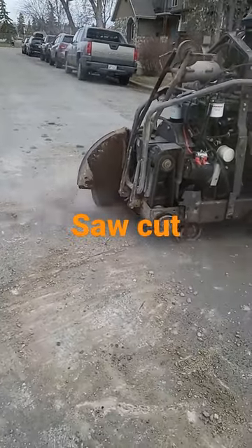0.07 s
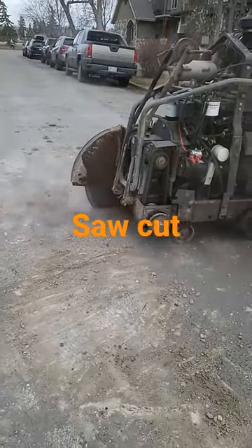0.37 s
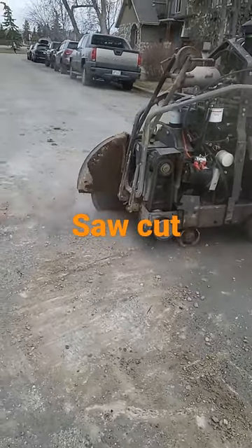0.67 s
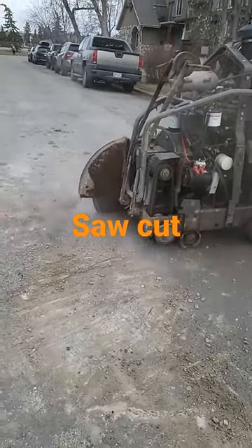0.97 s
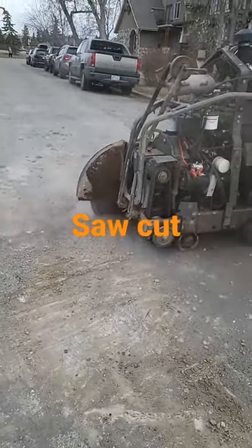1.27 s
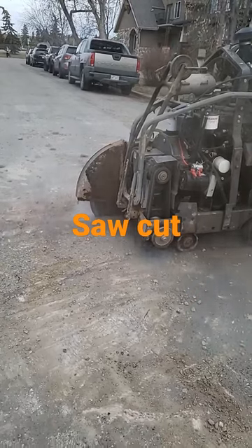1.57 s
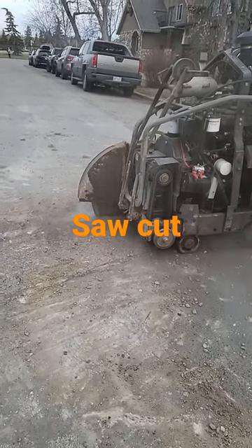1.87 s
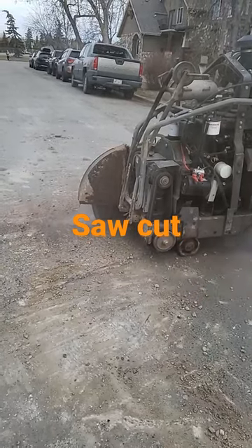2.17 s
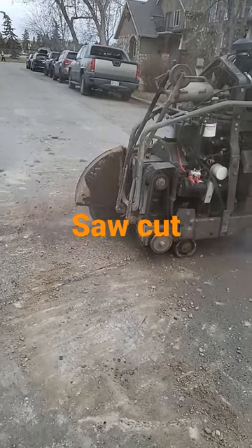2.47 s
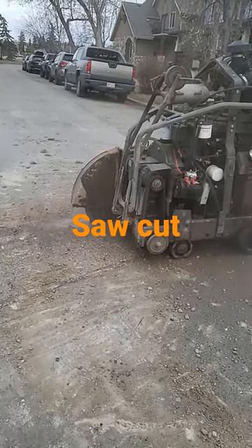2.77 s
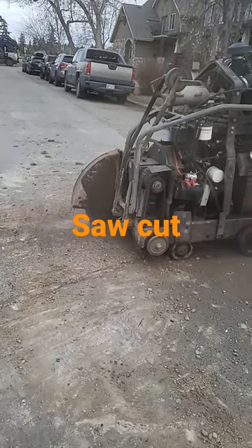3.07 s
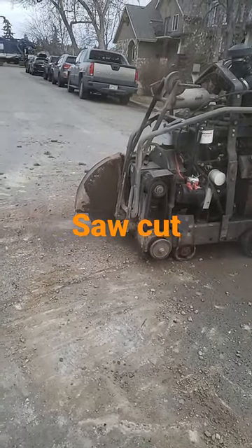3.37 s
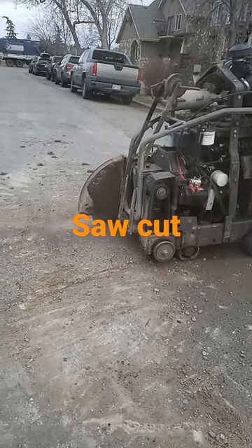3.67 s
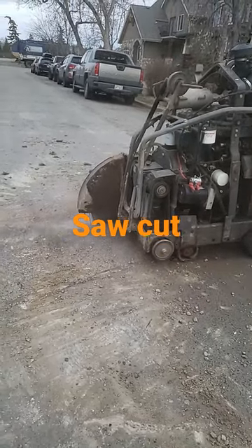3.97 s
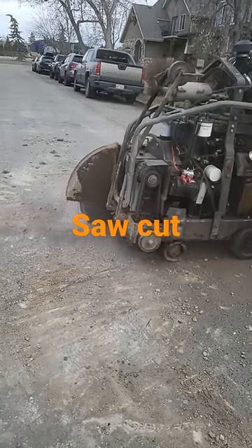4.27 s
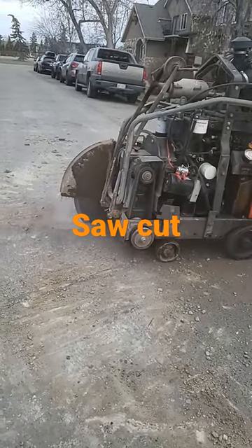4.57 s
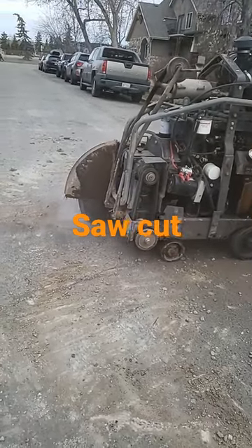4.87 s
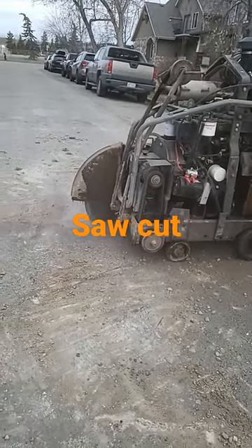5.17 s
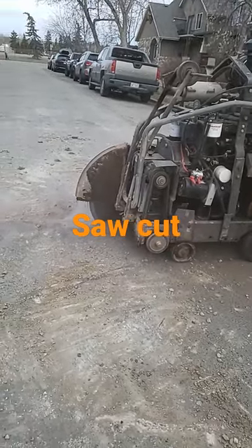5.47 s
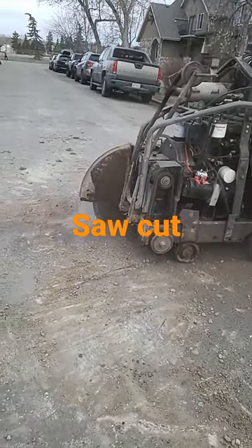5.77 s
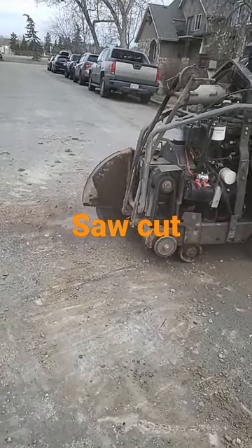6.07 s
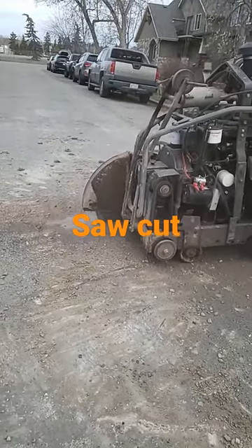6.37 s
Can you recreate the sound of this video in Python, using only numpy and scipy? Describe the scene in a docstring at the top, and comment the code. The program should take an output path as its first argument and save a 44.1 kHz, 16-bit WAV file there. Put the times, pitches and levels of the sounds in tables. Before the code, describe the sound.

Outdoors on a street, a few metres away, a diesel pavement saw drones and rattles without a break. Gritty, sizzling grinding comes in two main stretches, each dragging the engine down into a rough bark, with ringing tones from the blade rubbing in the cut. After each, the hiss eases, the engine rises and the spinning blade whistles. The grinding returns right at the end.

```python
"""A walk-behind road saw is cutting a street a few metres away: its diesel engine drones, barks and
rattles while the teeth grind stone with a gritty hiss that rings the steel disc. After a second the
blade runs free, the engine speeds up and smooths out, and the blade's slots whistle clearly in the air.
At three seconds it bites again: the engine sags and barks, and the blade's side sings against the cut.
Past five seconds it runs free once more, then starts a last bite just after six."""
import sys
import numpy as np
from scipy.fft import rfft, irfft
from scipy.io import wavfile

SR = 44100
rng = np.random.default_rng(int(sys.argv[2]) if len(sys.argv) > 2 else 0)


def generate_wav(sig):
    """Save sig (samples, or channels by samples) to the path in sys.argv[1] as 16-bit PCM at SR."""
    pcm = np.round(np.clip(np.atleast_2d(sig).T, -1, 1) * 32767).astype(np.int16)
    wavfile.write(sys.argv[1], SR, pcm)


N = 282681
TIME, FREQ = np.arange(N) / SR, np.arange(N // 2 + 1) * SR / N

# Levels in the tables are relative: the functions add further gains.
# engine speed, as cylinder firings per second: time_s, firing_hz
ENGINE_SPEED = [(0.0, 97.1), (0.48, 89.8), (0.69, 96.6), (0.96, 99.2), (1.09, 103.9), (1.16, 105.2),
                (3.11, 105.2), (3.62, 92.3), (3.87, 88.0), (4.09, 93.1), (4.34, 89.5), (4.6, 81.5),
                (5.0, 84.2), (5.19, 84.7), (5.37, 98.4), (5.44, 103.9), (5.5, 104.7), (6.09, 104.9),
                (6.36, 100.4), (6.41, 100.2)]
# how loud the engine is where the listener stands: time_s, gain_db
ENGINE_LOUDNESS = [(0, -0.5), (1.2, 0.2), (2.0, -0.5), (2.65, 3), (3.35, 4), (3.55, 1.2), (4.1, 1.4),
                   (4.7, -0.5), (5.6, 1), (6.41, 0.4)]
# exhaust tones: firing_multiple, free_db, full_fuel_db, full_drag_added_db, shift_rad, flicker_db
DRONE_TONES = [(1, -26, -17.5, 1.15, 1.87, 1.03), (2, -27, -28.5, 3, 1.17, 2.17),
               (3, -34.5, -24.5, -12, 0.31, 2.0)]
# strength of the four cylinders in firing order: level_db
CYLINDER_LEVELS = [2.5, -4, 1.5, -.5]
# pitches at which the muffler rings: pitch_hz, width_hz, level_db
MUFFLER_RINGS = [(355, 90, 0), (412, 90, -.5), (475, 90, -4), (555, 80, -10.5), (840, 90, -21),
                 (1010, 80, -22.5)]
# lows and highs of the engine's rattle: frequency_hz, level_db
RATTLE_COLOUR = [(25, -10), (60, -1.5), (130, -1), (370, 10.5), (650, -2), (820, -1.5), (1150, -7),
                 (1420, -5), (1580, -5.5), (2050, -5.5), (2350, -7), (4300, -9.5), (7000, -26),
                 (15000, -34)]
# tones of the crankshaft and belt: firing_multiple
SHAFT_MULTIPLES = [.59, 1.5, 2.5, 3.5, 4, 4.5, 5, 7, 9.75]
# strength of each of those tones: level_db
SHAFT_LEVELS = [-49.5, -41, -47, -40.5, -42, -45.5, -59, -49, -56]
# how hard the blade bites the pavement: time_s, level_db
BLADE_BITE = [(0.0, -24.5), (0.34, -22.5), (0.59, -25), (0.77, -22.5), (1.14, -29.5), (1.25, -37),
              (1.96, -39.5), (2.68, -37), (3.14, -37), (3.19, -21), (3.32, -20.5), (3.45, -24), (3.71, -25),
              (4.0, -28), (4.12, -23), (5.19, -24.5), (5.3, -30.5), (5.64, -35), (5.98, -36.5), (6.07, -31),
              (6.39, -25), (6.41, -23)]
# lows and highs of the grinding stone: frequency_hz, level_db
STONE_COLOUR = [(500, -14), (1500, -11), (2100, -8), (2600, -4), (2900, -2), (4400, 0), (5600, -2.3),
                (7400, -4.5), (8100, -3.5), (9100, -7), (10500, -5.7), (12000, -14), (15500, -18)]
# the very high sizzle above the grinding: frequency_hz, level_db
HIGH_SIZZLE_COLOUR = [(5000, -50), (9500, -20), (11300, -7), (11900, .5), (12700, 1), (13600, -1.5),
                      (14300, 0), (15500, -2)]
# pitches that the blade guard boosts: pitch_hz, width_hz, boost_db
GUARD_RINGS = [(3750, 160, 1.5), (7750, 220, 3), (11930, 130, 2), (12650, 120, 1.5), (14370, 120, 2)]
# pitches at which the steel disc rings: pitch_hz, level_db
DISC_RINGS = [(1420, -3), (2885, 1), (3600, -8), (4070, -4), (4410, 1), (4850, -6), (5146, -4), (6900, -7),
              (7670, -3), (9269, -4), (10780, -4), (11957, -1), (12370, -3), (14748, -6)]
# the whistle falls with engine speed, then levels off: firing_hz, pitch_hz
WHISTLE_PITCH = [(82, 1655), (90, 1675), (96.5, 1715), (100.3, 1792), (105.2, 1843)]
# tones in the whistle: pitch_multiple, free_db, full_drag_db
WHISTLE_TONES = [(.983, -6, -15), (1, 3, -8.5), (1.073, -10, -20)]
# moments when the whistle swells: start_s, end_s, level_db
WHISTLE_SWELLS = [(-.1, 0.374, -31.5), (0.543, 1.152, -32.5), (1.167, 1.72, -33.5), (1.658, 2.377, -37.5),
                  (2.367, 2.65, -33.5), (2.603, 3.2, -38), (3.148, 3.42, -28.5), (3.35, 4.465, -33),
                  (4.38, 5.283, -38), (5.22, 5.44, -29), (6.097, 6.5, -31)]
# the blade's side rubs the cut: start_s, end_s, first_pitch_hz, last_pitch_hz, width_hz, level_db, fade_s
SIDE_RUBS = [(0.333, 0.622, 1535, 1510, 20, -40.5, 0.064), (1.596, 3.505, 2037, 2125, 150, -44.5, 0.25),
             (3.173, 3.899, 3840, 3720, 35, -41, .12), (4.195, 4.542, 1584, 1465, 29, -41, .08),
             (4.484, 5.323, 1468, 1466, 14, -44, 0.11)]
# the blade snags and jolts the machine: time_s, half_length_s, added_db
BLADE_SNAGS = [(3.33, .03, 1), (4.23, 0.023, 2), (5.393, 0.083, 1)]
# strength of the scattered sound that makes left and right differ: frequency_hz, gain_db
STEREO_WIDTH = [(30, -9), (100, -7), (250, -38), (500, -11.5), (950, -3.5), (3000, -3), (13000, -1.5)]
# how much louder the left side is than the right: frequency_hz, left_minus_right_db
STEREO_LEAN = [(100, 0), (200, -1.5), (320, 5), (420, -1.5), (600, .5), (1200, 2.5), (4000, 1), (9000, 4.5),
               (14000, 1.3)]

FREE_FIRING_HZ = 105  # engine speed with nothing to cut
LEFT_RIGHT = np.array([[1], [-1]])  # adds on the left, subtracts on the right


def undb(db):
    """Turn decibels into a number to multiply by."""
    return 10 ** (np.asarray(db) / 20)


def unit(x):
    """Scale a signal to an average strength (rms) of 1."""
    return x / np.sqrt(np.mean(x ** 2))


def curve(points):
    """Join (time_s, value) points with straight lines."""
    return np.interp(TIME, *np.transpose(points))


def shape(points):
    """Turn (frequency_hz, level_db) points into a gain at every frequency."""
    hz, db = np.transpose(points)
    return undb(np.interp(np.log(FREQ + 1), np.log(hz), db))


def resonance(hz, width_hz):
    """A filter for something that rings at one pitch, with gain 1 there."""
    return 1j * FREQ * width_hz / (hz ** 2 - FREQ ** 2 + 1j * FREQ * width_hz)


def filtered(x, response):
    """Turn each frequency of a sound up or down."""
    return irfft(rfft(x) * response, N)


def wander(rate_hz):
    """A smooth random wobble, about 1 in size."""
    return unit(filtered(rng.standard_normal(N), np.exp(-(FREQ / rate_hz) ** 2)))


def stereo(direct, scattered):
    """Direct sound is alike on both sides; what the street scatters is not."""
    return direct + LEFT_RIGHT * filtered(scattered, shape(STEREO_WIDTH))


def breathy_tone(hz, width_hz):
    """A narrow band of stereo noise around a moving pitch."""
    phase = 2 * np.pi * np.cumsum(hz) / SR
    return stereo(*[wander(width_hz) * np.cos(phase) + wander(width_hz) * np.sin(phase)
                    for _ in range(2)])


def swell(start_s, end_s, fade_s):
    """Fade in, hold and fade out."""
    return np.clip(np.minimum(TIME - start_s, end_s - TIME) / fade_s, 0, 1)


def governor(firing_hz, slack_hz=0.79, range_hz=3.2, open_s=0.055, shut_s=0.037):
    """Extra fuel, 0 to 1: the valve opens a moment after the engine slows, and shuts more quickly."""
    earlier_hz = [np.interp(TIME - lag_s, TIME, firing_hz) for lag_s in (open_s, shut_s)]
    sag_hz = FREE_FIRING_HZ - np.maximum(*earlier_hz)
    return np.clip((sag_hz - slack_hz) / range_hz, 0, 1)


def exhaust_drone(firings, fuel, drag):
    """The exhaust's smooth pressure wave: more fuel makes it louder, shifts it and unsteadies it."""
    out = 0
    for multiple, free_db, full_db, drag_db, shift_rad, flicker_db in DRONE_TONES:
        lag_rad = 0.32 * LEFT_RIGHT * (multiple == 2)  # the octave reaches one side later
        phase = 2 * np.pi * multiple * firings - lag_rad
        free = undb(free_db) * np.cos(phase)
        working = undb(full_db + drag * drag_db) * np.cos(phase - shift_rad)
        flicker = undb(flicker_db * (1 + 2 * fuel) / 3 * wander(9))
        out = out + flicker * ((1 - fuel) * free + fuel * working)
    return np.sqrt(2) * out


def exhaust_bark(firings, level_db, jitter_s=.0002, scatter_db=2.2, low_hz=285, high_hz=1300):
    """Each firing sends a sharp pulse and a puff of rushing gas through the muffler."""
    starts = np.flatnonzero(np.diff(np.floor(firings)))
    timing, strength = rng.standard_normal((len(starts), 2)).T
    places = np.clip(starts + jitter_s * SR * timing, 0, N - 1).astype(int)
    pulses = np.zeros(N)
    pulses[places] = undb(np.resize(CYLINDER_LEVELS, len(starts)) + scatter_db * strength)
    puffs = np.exp(-(firings % 1)) * rng.standard_normal(N)
    muffler = sum((-1) ** k * undb(db) * resonance(hz, width_hz)
                  for k, (hz, width_hz, db) in enumerate(MUFFLER_RINGS))
    muffler = muffler / (1 + (low_hz / (FREQ + 1)) ** 4) / (1 + (FREQ / high_hz) ** 4)
    bark = unit(filtered(unit(pulses) + .8 * unit(puffs), muffler)) * undb(level_db)
    return stereo(bark, street_echoes(bark))


def street_echoes(x, decay_s=.08):
    """Many short echoes come off the ground, parked cars and house fronts."""
    tail = rng.standard_normal(N) * np.exp(-TIME / decay_s)
    return filtered(x, rfft(tail) / np.sqrt(np.sum(tail ** 2)))


def engine_rattle(firings, level_db, low_hz=200, high_hz=1300, size=2048):
    """Valves, injectors and fan: a rattle that repeats every four firings, over fresh noise."""
    knock = 1 + 0.14 * np.cos(2 * np.pi * firings)
    colour = shape(RATTLE_COLOUR) * guard_echo()
    layers = []
    for _ in range(2):
        loop = np.interp(firings / 4 % 1 * size, np.arange(size), rng.standard_normal(size))
        loop = filtered(unit(loop), FREQ / (FREQ + low_hz) / (1 + (FREQ / high_hz) ** 2))
        rattle = (1.34 * loop + rng.standard_normal(N)) * knock
        layers.append(unit(filtered(rattle, colour)) * undb(level_db))
    return stereo(*layers)


def guard_echo(delay_s=.00261):
    """A filter: a flipped echo from the guard's open edge ripples the upper middle pitches."""
    echo = .3 * np.exp(-2j * np.pi * FREQ * delay_s)
    return 1 - np.abs(resonance(hz=3300, width_hz=2800)) * echo


def shaft_hum(firings, flicker_db=3.0):
    """The crankshaft and belt hum with tones that follow the engine speed."""
    phases = 2 * np.pi * rng.random(len(SHAFT_MULTIPLES))
    out = 0
    for multiple, db, phase in zip(SHAFT_MULTIPLES, SHAFT_LEVELS, phases):
        tone = np.sqrt(2) * np.cos(2 * np.pi * multiple * firings + phase)
        out = out + tone * undb(db + flicker_db * wander(11))
    return out


def grinding(firings, drag, level_db, colour, turns_per_firing=.2325, grains_per_s=6000):
    """Diamond teeth crush grains; a free blade brushes once a turn, a buried one shakes with firings."""
    body = shape(colour) * guard_echo()
    for hz, width_hz, db in GUARD_RINGS:
        body = body * undb(db * np.abs(resonance(hz, width_hz)) ** 2)
    turn = 2 * np.pi * turns_per_firing * firings
    brush = .11 * (1 - .7 * drag) * (np.cos(turn) + .5 * np.cos(2 * turn) + .35 * np.cos(3 * turn))
    shake = 0.011 * drag * (np.cos(2 * np.pi * firings) + np.cos(np.pi * firings))
    pressure = (1 + brush + shake) * undb(level_db + 0.2 * wander(18))
    hits = rng.random(N) < grains_per_s / SR
    grains = hits * undb(3.0 * np.minimum(rng.exponential(size=N), 5))
    grit = np.sqrt(1 + 0.18 * unit(grains) ** 2)
    return stereo(*[unit(filtered(grit * rng.standard_normal(N), body)) * pressure for _ in range(2)])


def cut_echo(hiss, drag):
    """The bite point wanders in the narrow cut, so its echo off the wall sweeps through the hiss."""
    delay_s = .0011 * (1 + .07 * wander(16))
    strength = .4 * np.sqrt(drag)
    earlier = np.rint(np.arange(N) - delay_s * SR).astype(int)
    return (hiss + strength * hiss[:, earlier]) / np.sqrt(1 + strength ** 2)


def disc_ring(bite_db):
    """The steel disc rings at the lightest touch, and grows only half as fast as the bite."""
    power = sum(np.abs(undb(db) * resonance(hz, width_hz=45)) ** 2 for hz, db in DISC_RINGS)
    ring = stereo(*[unit(filtered(rng.standard_normal(N), np.sqrt(power))) for _ in range(2)])
    return ring * undb(0.52 * bite_db - 27)


def slot_whistle(firing_hz, drag, side_shift_rad=0.44, floor_db=-45.5):
    """The slots chop the air: a clear tone when the blade runs free, split and breathy as it drags."""
    pitch_hz = np.interp(firing_hz, *np.transpose(WHISTLE_PITCH))
    cycles = np.cumsum(pitch_hz) / SR
    tones = 0
    for multiple, free_db, drag_db in WHISTLE_TONES:
        waver_rad = 0.61 * (1 + drag) * wander(39)
        flicker_db = 2.0 * (1 + drag) * wander(11)
        phase = 2 * np.pi * multiple * cycles + waver_rad + side_shift_rad * LEFT_RIGHT
        tone_db = free_db + drag * (drag_db - free_db) + flicker_db - 5
        tones = tones + np.sqrt(2) * undb(tone_db) * np.cos(phase)
    air = breathy_tone(pitch_hz, width_hz=90) * (undb(-18) + drag * undb(-5))
    swells = [undb(db) * swell(start_s, end_s, fade_s=0.052) for start_s, end_s, db in WHISTLE_SWELLS]
    level = np.maximum(np.max(swells, axis=0), undb(floor_db))  # a faint tone lingers between swells
    return (tones + air) * level


def side_rubs():
    """The blade's side rubs in the cut and sings unsteadily, sliding in pitch."""
    out = 0
    for start_s, end_s, first_hz, last_hz, width_hz, db, fade_s in SIDE_RUBS:
        pitch_hz = curve([(start_s, first_hz), (end_s, last_hz)])
        out = out + breathy_tone(pitch_hz, width_hz) * undb(db) * swell(start_s, end_s, fade_s)
    return out


def snag_jolts():
    """Decibels added to the bark and rattle when the blade snags and jolts the machine."""
    return sum(db * np.exp(-((TIME - time_s) / half_s) ** 2) for time_s, half_s, db in BLADE_SNAGS)


def scene():
    """One crankshaft sets the pace of the exhaust, the rattle, the belt and the blade."""
    firing_hz = curve(ENGINE_SPEED)
    firings = np.cumsum(firing_hz * (1 + 0.0018 * wander(7.5))) / SR  # running count of firings
    drag = np.clip((FREE_FIRING_HZ - firing_hz) / 20, 0, 1)  # how much the cut slows the engine
    fuel = governor(firing_hz)
    jolt_db = snag_jolts()
    bark_db = np.interp(fuel, [0, 1], [-49, -25.5]) + jolt_db
    rattle_db = np.interp(fuel, [0, 1], [-31.5, -28]) + jolt_db
    exhaust = exhaust_drone(firings, fuel, drag) + exhaust_bark(firings, bark_db)
    engine = (exhaust + engine_rattle(firings, rattle_db)) * undb(curve(ENGINE_LOUDNESS))

    bite_db = curve(BLADE_BITE)
    hardness_db = 0.5 * wander(10)  # pebbles and soft binder pass under the teeth in turn
    stone = grinding(firings, drag, bite_db + hardness_db - 2.5, STONE_COLOUR)
    sizzle_db = bite_db.max() + 0.98 * (bite_db - bite_db.max())  # dies back as the bite eases
    sizzle = grinding(firings, drag, sizzle_db + hardness_db + 0.5, HIGH_SIZZLE_COLOUR)
    whistle = slot_whistle(firing_hz, drag)
    blade = whistle + cut_echo(stone, drag) + sizzle + disc_ring(bite_db) + side_rubs()
    return engine + shaft_hum(firings) + blade


def record(dry, peak_limit=.9, top_hz=15500):
    """Colour left and right a little differently, round the tallest peaks and cut the highest treble."""
    lean = np.sqrt(shape(STEREO_LEAN))
    heard = filtered(dry, np.array([lean, 1 / lean]))
    rounded = heard / (1 + (heard / peak_limit) ** 6) ** (1 / 6)
    return filtered(rounded, np.clip((top_hz + 80 - FREQ) / 100, 0, 1))


dry = scene()
out = record(dry)
generate_wav(out)
```